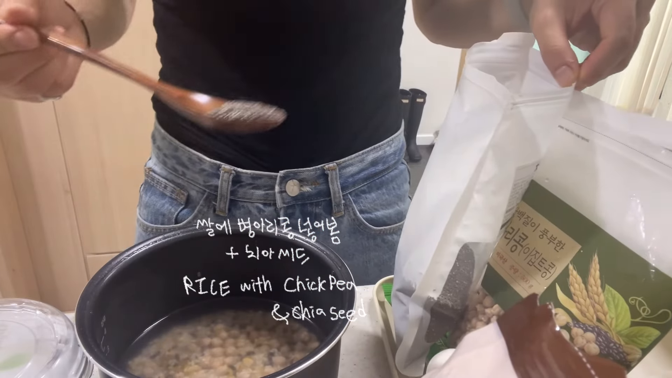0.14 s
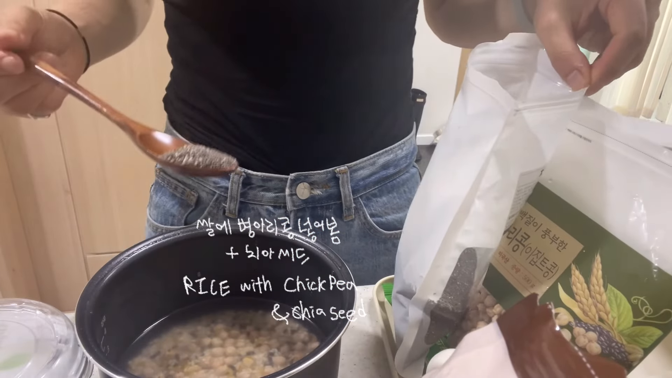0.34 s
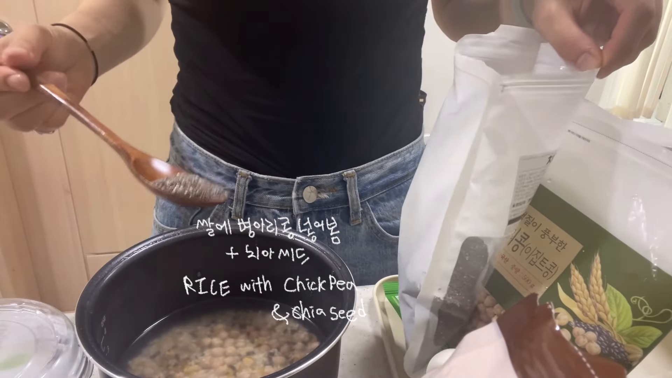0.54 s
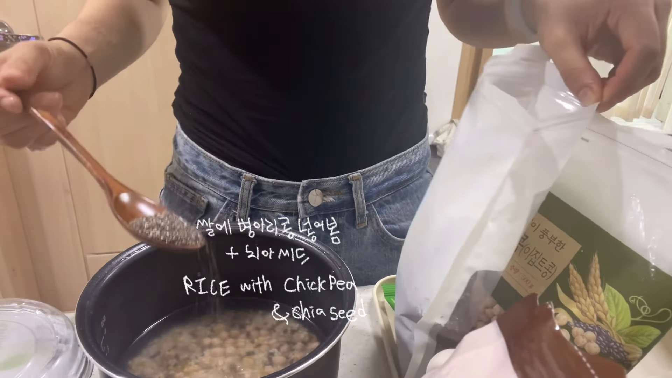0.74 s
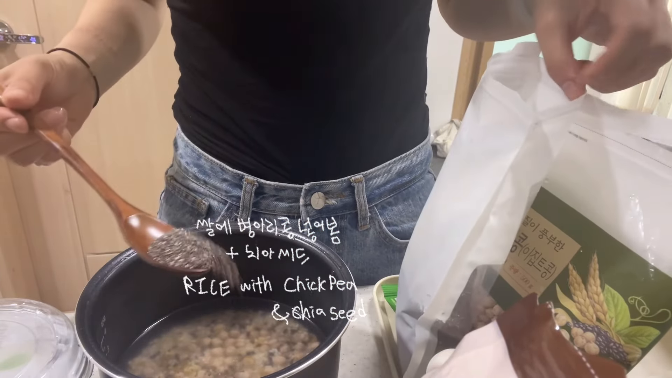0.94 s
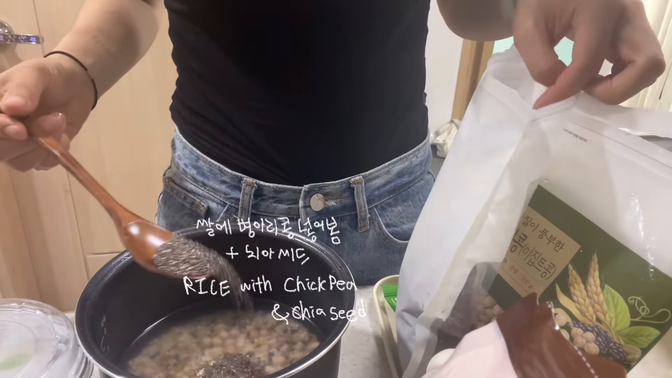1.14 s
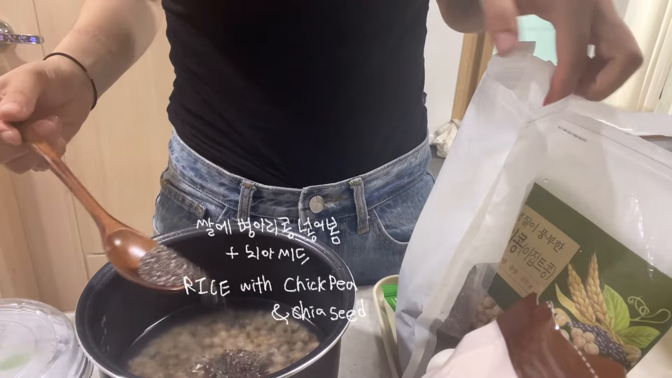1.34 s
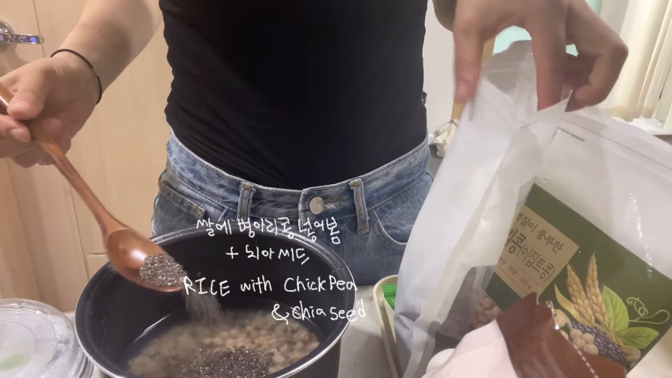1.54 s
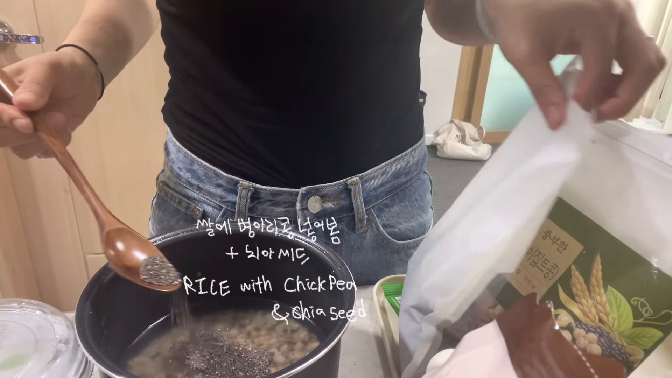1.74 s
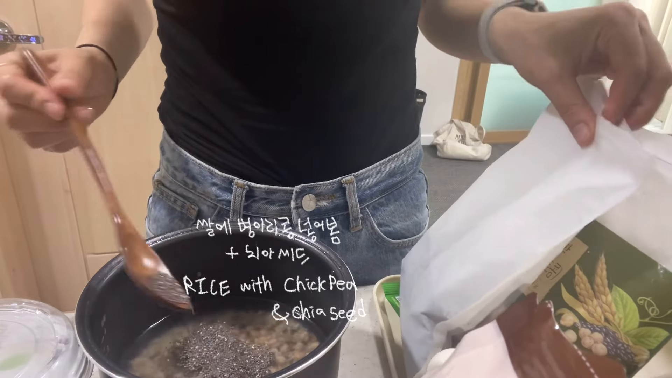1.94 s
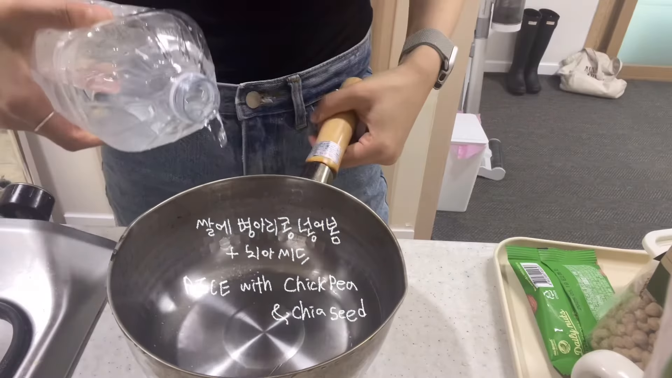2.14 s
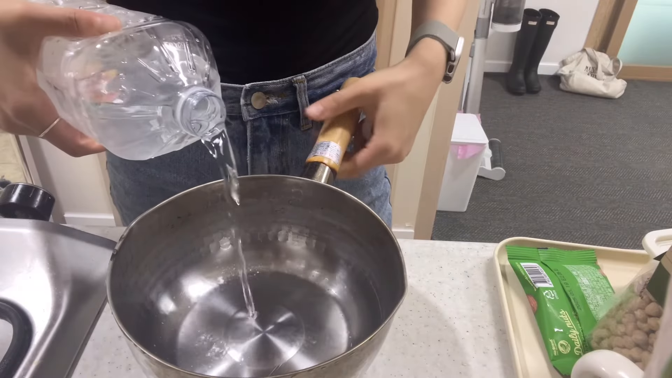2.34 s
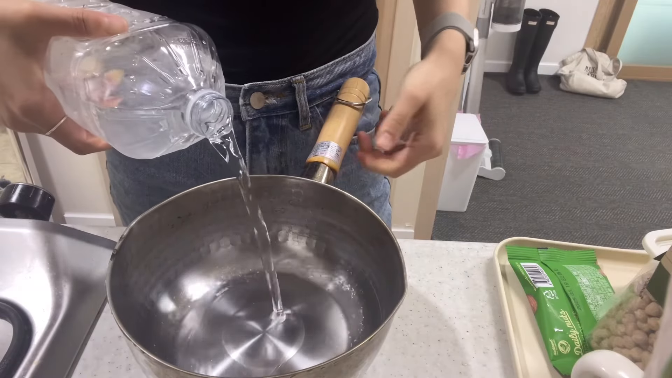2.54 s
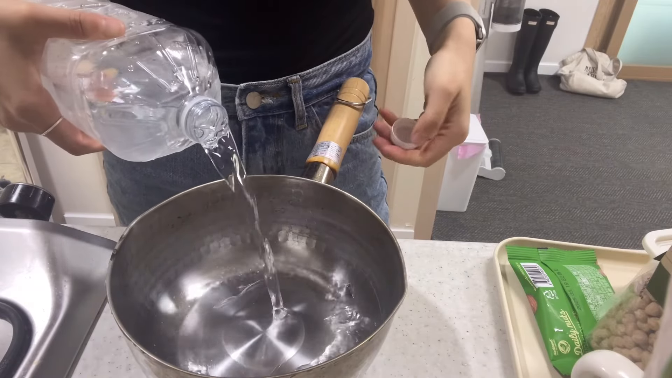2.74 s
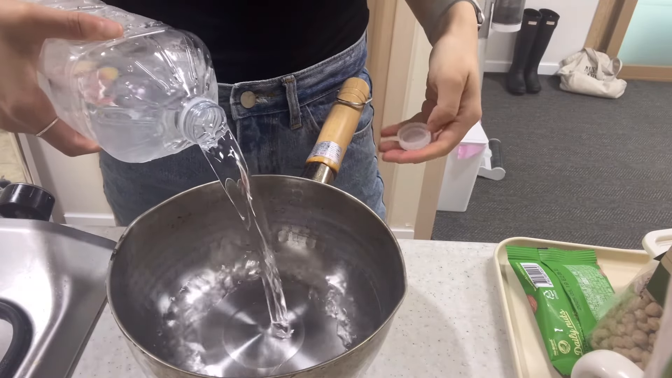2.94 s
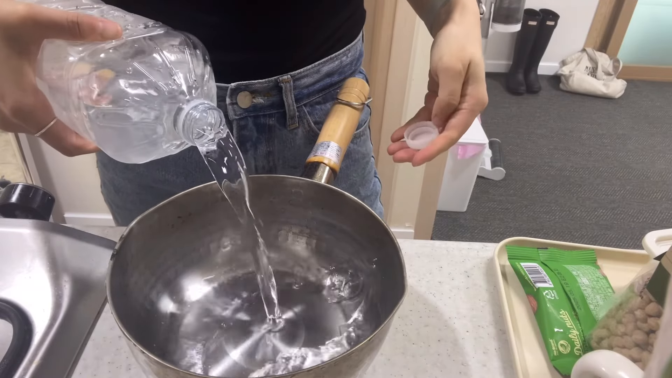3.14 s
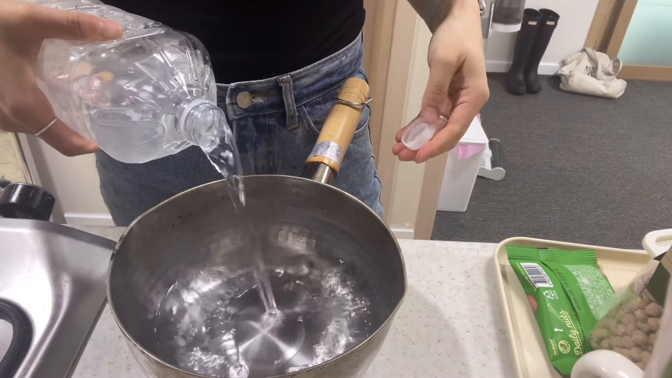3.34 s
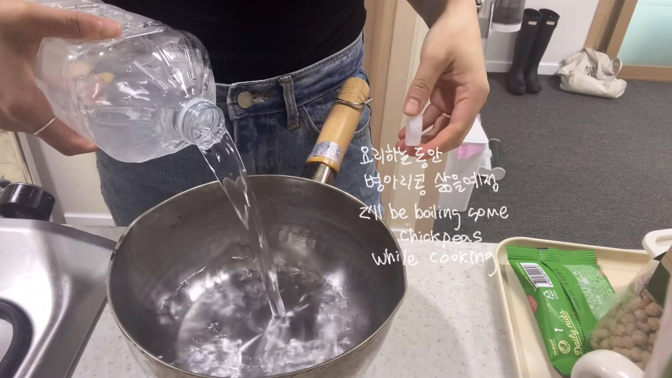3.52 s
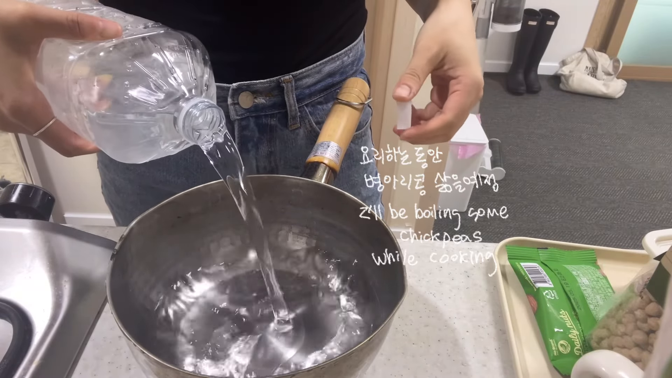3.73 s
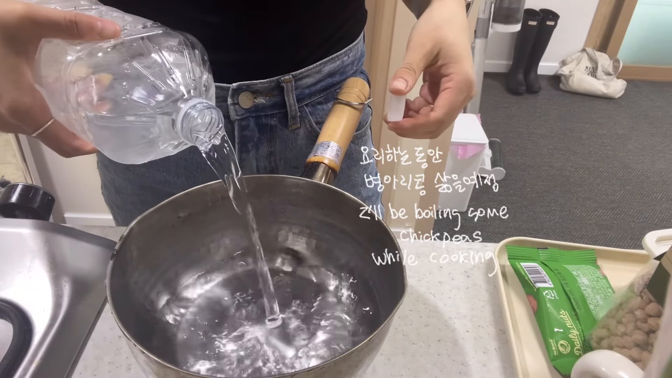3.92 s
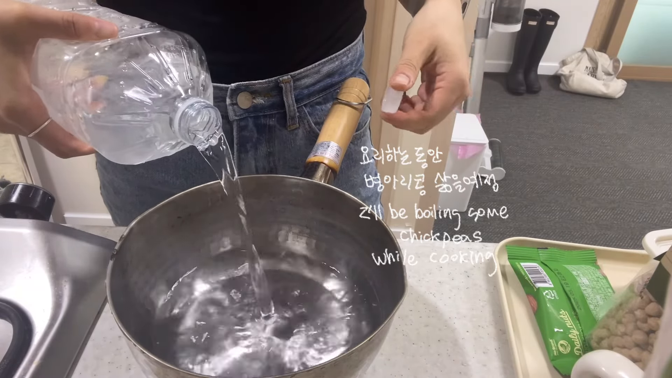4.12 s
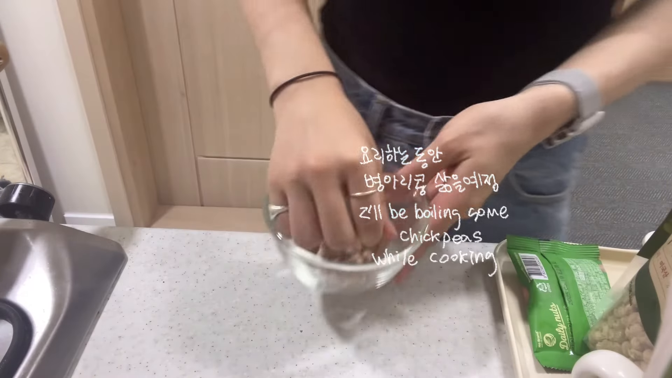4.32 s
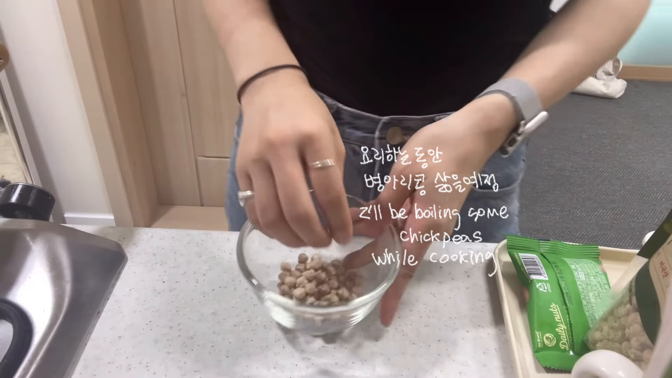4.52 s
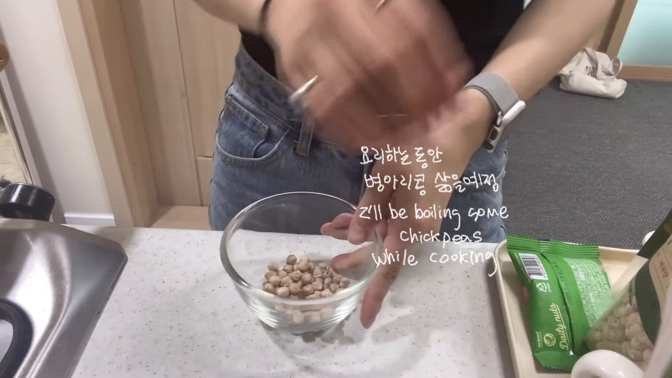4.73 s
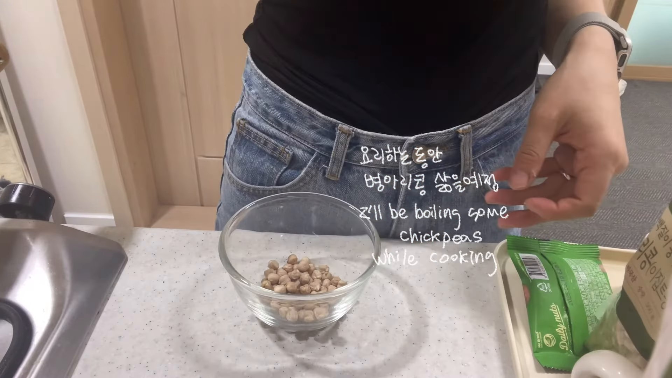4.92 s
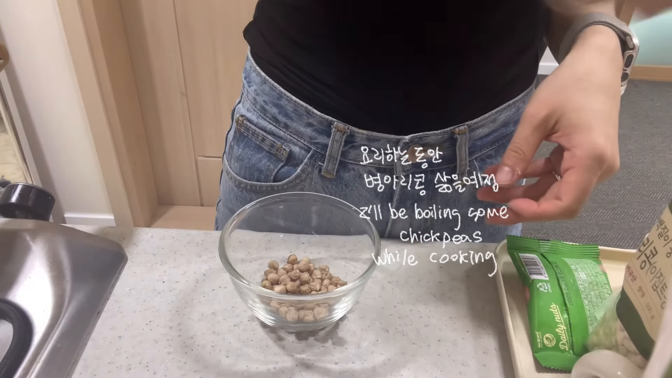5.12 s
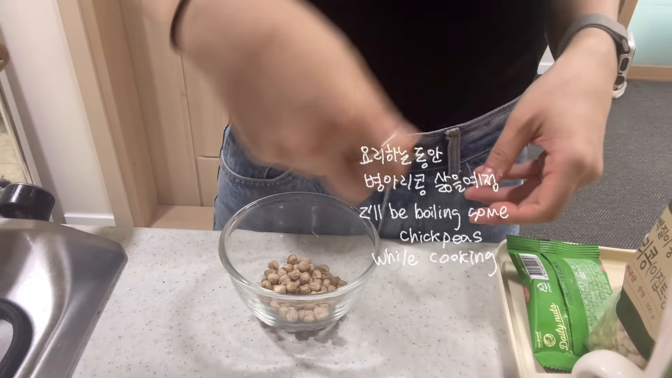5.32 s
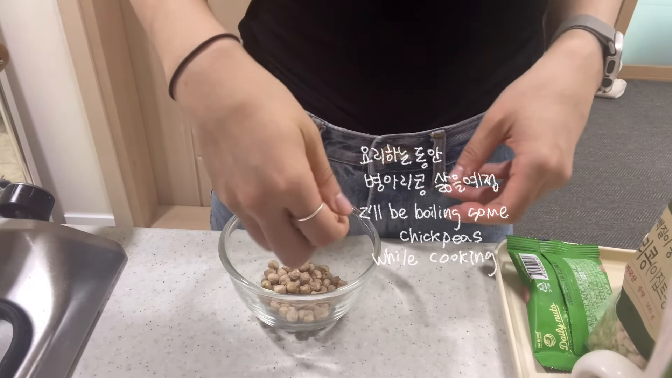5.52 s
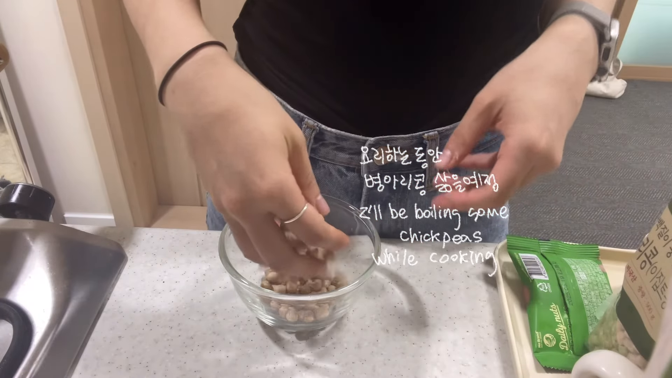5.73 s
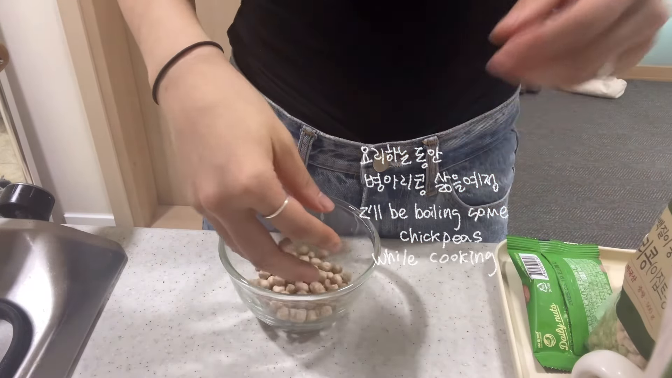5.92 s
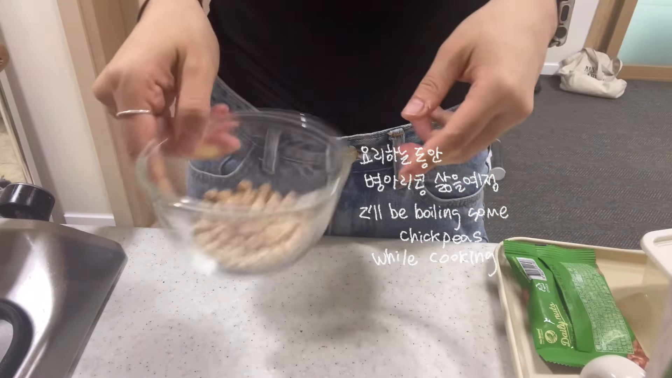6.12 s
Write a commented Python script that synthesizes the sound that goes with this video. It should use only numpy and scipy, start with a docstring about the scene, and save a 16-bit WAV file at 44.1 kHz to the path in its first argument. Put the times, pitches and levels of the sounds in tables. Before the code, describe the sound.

Film crinkles in bursts, with soft seed hiss between them. A hollow thump and a steely clink follow, then splashing water with rising bubble notes and fizz. It cuts off to a light glass clink, heavy bowl knocks, sparse pea ticks and a quick final rattle on glass. Close small microphone, short lively room, low hum and thin hiss.

```python
"""A small kitchen: a plastic bag rustles in noisy slips and crinkles while chia seeds hiss off a spoon.
A steel pan thumps down and clinks in ringing modes, and a thin stream of bottled water gushes into it
as rising bubble tones, splashes and fizz. A glass bowl knocks on the counter, sending bending waves through it,
a finger ring clinks on the glass, and dry chickpeas rattle in as clicks, glass notes and dull thuds.
An appliance rumble with one faint tone and a thin hiss lie underneath."""
import sys
import numpy as np
from scipy import signal
from scipy.fft import rfft, irfft
from scipy.io import wavfile

SR = 44100
rng = np.random.default_rng(int(sys.argv[2]) if len(sys.argv) > 2 else 0)


def wav_record(signal):
    """Record a signal, one row per channel, as 16-bit PCM in the file named by sys.argv[1]."""
    frames = np.transpose(np.atleast_2d(signal))
    bounded = np.clip(frames, -1, 1)
    # unit amplitude maps onto the largest positive 16-bit level
    quanta = np.round(bounded * 32767).astype(np.int16)
    wavfile.write(sys.argv[1], SR, quanta)


N = 272097


def amp(db):
    """Decibels to linear gain."""
    return 10 ** (np.asarray(db) / 20)


def rms_one(x):
    """Scale to an RMS level of one."""
    return x / np.sqrt(np.mean(x ** 2) + 1e-20)


def peak_one(x):
    """Scale to a peak of one."""
    return x / (np.abs(x).max() + 1e-20)


def at_hz(points, hz):
    """Read a frequency curve, interpolating along log frequency."""
    point_hz, values = np.array(points).T
    return np.interp(np.log(hz + 1), np.log(point_hz), values)


def add(out, s, sound):
    """Mix a sound in at time s."""
    at = max(round(s * SR), 0)
    out[at:at + len(sound)] += sound[:max(N - at, 0)]


def cut(x, hz, kind, order=2):
    """Butterworth low, high or band filter."""
    sos = signal.butter(order, np.clip(hz, 10, .45 * SR), kind, fs=SR, output="sos")
    return signal.sosfilt(sos, x)


def colour(x, spectrum, size=4096):
    """Causal (minimum-phase) filter with the given spectrum."""
    hz = np.arange(size // 2 + 1) * SR / size
    cepstrum = irfft(np.log(amp(at_hz(spectrum, hz))))
    # folding the cepstrum forward puts the energy as early as possible
    cepstrum[1:size // 2] *= 2
    cepstrum[size // 2 + 1:] = 0
    response = irfft(np.exp(rfft(cepstrum)))
    return signal.fftconvolve(x, response)[:len(x)]


def ring(clicks, hz, t60):
    """A resonator: a unit click sets a sine of height 1 ringing, 60 dB down after t60 seconds."""
    r, w = amp(-60 / (t60 * SR)), 2 * np.pi * hz / SR
    return signal.lfilter([0, np.sin(w)], [1, -2 * r * np.cos(w), r * r], clicks + 1e-18)


def crack(t60, size=2048):
    """The short noise burst of one contact."""
    return rng.standard_normal(size) * amp(-60 * np.arange(size) / SR / t60)


def grains(per_s, spread_db):
    """Random clicks of uneven size and either polarity."""
    sizes = amp(spread_db * np.minimum(rng.exponential(1, N), 4))
    return (rng.random(N) < per_s / SR) * sizes * rng.choice([-1, 1], N)


def swell(s, rise_s, fall_s, edge_db=10.5, roundness=1.47):
    """A rounded rise and fall around time s, down by edge_db after one rise or fall time."""
    t = np.arange(N) / SR - s
    away = np.minimum(np.abs(t / np.where(t < 0, rise_s, fall_s)), 10)
    return amp(-edge_db * away ** roundness)


def envelope(s, attack_s, hold_s, fall_db_per_s):
    """Attack, hold and a steady fall in dB."""
    t = np.arange(N) / SR - s
    return np.clip(t / attack_s, 0, 1) * amp(-fall_db_per_s * np.clip(t - attack_s - hold_s, 0, 1))


# How long the kitchen rings. Each row: frequency in Hz, decay by 60 dB in seconds.
ROOM_T60 = [(100, 0.55), (500, 0.42), (2000, 0.38), (8000, 0.25), (16000, 0.25)]


def kitchen(x, wet_db, size=24000):
    """Direct sound plus a dense tail that dies sooner in the treble."""
    t, hz = np.arange(size) / SR, np.arange(size // 2 + 1) * SR / size
    noise = rfft(rng.standard_normal(size))
    centres = np.log([f for f, t60 in ROOM_T60])
    tail = np.zeros(size)
    for row, (f, t60) in zip(np.eye(len(centres)), ROOM_T60):
        share = np.interp(np.log(hz + 1), centres, row)   # crossfaded bands
        tail += irfft(noise * share) * amp(-60 * t / t60)
    tail *= np.clip((t - .002) / 0.0058, 0, 1)   # short pre-delay, then a quick build-up
    return x + amp(wet_db) * signal.fftconvolve(x, tail / np.linalg.norm(tail))[:N]


# Rumble spectrum. Each row: frequency in Hz, relative level in dB.
HUM = [(18, -37), (30, -43), (59, -2.5), (91, -21.5), (103, -0.5), (151, -8), (205, -5.5), (385, -17),
       (421, -10), (446, -23), (839, -18), (1000, -18.5), (1300, -50), (2200, -120)]
# Hiss spectrum. Each row: frequency in Hz, relative level in dB.
HISS = [(260, -10), (450, -14.5), (1220, 1.5), (1730, -10), (2400, -3), (2870, -6.5), (4110, -8.5),
        (6340, -17), (6830, -14), (8050, -13.5), (8930, -21), (12400, -17.5), (16000, -23)]
# Hiss level over time. Each row: time in seconds, RMS level in dB.
HISS_DB = [(0, -57.5), (2.1, -72.5), (2.13, -68), (2.7, -70), (4.17, -63), (4.19, -57), (4.9, -57.5),
           (6.17, -56.5)]


def room_tone():
    """A low appliance rumble with one faint tone, under a thin hiss."""
    t = np.arange(N) / SR
    rumble = amp(-56.3) * rms_one(colour(rng.standard_normal(N), HUM))
    tone = amp(-57.5) * np.sin(2 * np.pi * 148.5 * t)
    hiss_level = amp(np.interp(t, *np.transpose(HISS_DB)))
    return rumble + tone + hiss_level * rms_one(colour(rng.standard_normal(N), HISS))


# The hand shifts the bag. Each row: time of the height in seconds, relative rustle level in dB,
# relative low flapping level in dB, rise in seconds, fall in seconds.
RUBS = [(0.03, -51.5, -56, .05, 0.047), (0.2, -45, -56, .14, 0.062), (0.49, -36, -50, 0.22, 0.12),
        (0.675, -38, -41.5, 0.029, 0.037), (0.805, -51.5, -55, 0.038, 0.062),
        (0.942, -42.5, -60, 0.041, 0.045), (1.46, -73, -47, 0.042, 0.078),
        (1.63, -53.5, -51.5, 0.08, 0.046), (1.705, -36.5, -37.5, 0.022, 0.023),
        (1.789, -49, -38.5, 0.049, 0.028), (1.94, -48.5, -50, 0.21, .09)]
# Spectrum of the sliding film. Each row: frequency in Hz, relative level in dB.
RUSTLE = [(290, -34), (500, -10.5), (819, -17), (906, -10.5), (1110, -10.5), (1640, 0), (2260, -10.5),
          (3290, -6.5), (5470, -13.5), (6140, -9.5), (7100, -15), (16000, -34)]
# Spectrum of the flapping sheet. Each row: frequency in Hz, relative level in dB.
FLAP = [(47, -36), (80, 7.5), (146, 3.5), (404, 2.5), (803, -8), (896, -9), (1500, -10), (1950, -55),
        (3300, -120)]
# The loudest creases snapping. Each row: start in seconds, relative peak in dB, pitch in Hz,
# treble edge in dB beside the panel.
CREASES = [(0.078, -38, 1570, -21.5), (0.086, -24.5, 1590, -16), (0.133, -29, 1590, -27),
           (0.153, -31, 1600, -21), (0.319, -28, 1580, -31), (0.393, -19.5, 2100, -4),
           (0.643, -23.5, 1230, -3), (0.685, -13, 1229, -7.5), (1.43, -42, 894, -21),
           (1.474, -37, 980, -26), (1.574, -30, 882, -27), (1.626, -30, 1580, -36), (1.683, -31, 1490, -35),
           (1.702, -16.5, 1730, -21), (1.752, -18, 1600, -29), (1.767, -15, 1454, -30),
           (1.783, -21, 1250, -16), (1.855, -22, 1310, -18), (1.939, -26, 1600, -19),
           (1.969, -28, 1090, -20), (2.055, -27.5, 1080, -44), (2.096, -22.5, 824, -5)]
# Spectrum of a snapping panel. Each row: frequency in Hz, relative level in dB.
CREASE = [(60, -62), (250, 5), (600, 8), (1400, 8), (3000, 1.5), (6500, -1), (16000, -59)]


def bag():
    """The film slides in countless tiny slips, flaps and crinkles as a sheet, and snaps where a crease gives way."""
    rustle, flap = np.zeros((2, N))
    for s, rustle_db, flap_db, rise_s, fall_s in RUBS:
        rub = swell(s, rise_s, fall_s)
        rustle += amp(rustle_db) * rub
        flap += amp(flap_db) * rub

    fine_slips = rms_one(grains(per_s=5800, spread_db=3.5))
    coarse_slips = rms_one(grains(per_s=330, spread_db=8.0))
    slips = fine_slips + amp(-15) * coarse_slips
    slide = amp(-2.0) * rustle * rms_one(colour(slips, RUSTLE))
    effort = rustle / rustle.max()   # a harder rub is brighter
    slide += amp(-16.5) * rustle * effort * rms_one(cut(slips, (5500, 13000), "band", order=1))
    flaps = colour(grains(per_s=700, spread_db=2.0), FLAP)
    slide += amp(1) * flap * rms_one(cut(flaps, 76, "high"))

    # lesser creases, wherever the film moves
    crinkles_per_s, crinkle_hz = 57, (940, 1280, 1580)
    crinkles = np.zeros(N)
    for hz in crinkle_hz:
        crinkles += ring(grains(per_s=crinkles_per_s / len(crinkle_hz), spread_db=3.5), hz, t60=0.01)
    slide += amp(-7) * (flap + .35 * rustle) * rms_one(np.gradient(crinkles))

    snaps = np.zeros(N)
    for s, db, hz, treble_db in CREASES:
        burst = crack(t60=0.031)
        panel = peak_one(colour(burst, CREASE)) + peak_one(np.gradient(ring(burst, hz, t60=0.013)))
        panel = peak_one(cut(panel, 4000, "low"))
        edge = peak_one(cut(cut(burst, 5700, "high"), 11300, "low", order=1))
        add(snaps, s, amp(db - 4.0) * peak_one(panel + amp(treble_db) * edge))
    return kitchen(slide + snaps, wet_db=-13)


# Each shake of the spoon spills seeds. Each row: start in seconds, relative level in dB,
# attack in seconds, hold in seconds.
SPILLS = [(0.868, -54, 0.025, .04), (1.018, -51.5, 0.026, 0.076), (1.22, -47, 0.023, 0.013),
          (1.348, -57, .03, .02), (1.425, -52.5, 0.022, 0.017), (1.524, -54.5, 0.073, .03),
          (1.7, -52.5, 0.015, 0.009), (1.907, -62.5, 0.049, .1)]
# Spectrum of the trickling seeds. Each row: frequency in Hz, relative level in dB.
SEED_HISS = [(2060, -55), (3500, -30), (4540, -29), (4870, -9), (5190, -11), (6700, -3), (8740, -5),
             (9380, -0.5), (10400, -3.5), (12500, -2), (16000, -7.5)]


def seeds():
    """Thousands of tiny seeds make a fine, bright hiss that swells with each shake and trickles away."""
    flow = np.zeros(N)
    for s, db, attack_s, hold_s in SPILLS:
        flow += amp(db) * envelope(s, attack_s, hold_s, fall_db_per_s=167)
    return amp(-3.0) * flow * rms_one(colour(grains(per_s=9100, spread_db=4.0), SEED_HISS))


# Hollow modes of the pan's base on the counter. Each row: frequency in Hz, relative level in dB,
# decay by 60 dB in seconds.
THUMP = [(126, -18.5, 0.26), (255, 5, 0.031), (372, -11.5, 0.17), (530, -9.5, 0.035), (870, -25, 0.038)]


def thump(size=8000):
    """The pan lands flat: a tick and a short hollow boom of decaying modes."""
    out, t = np.zeros(N), np.arange(size) / SR
    boom = sum(amp(db - 60 * t / t60) * np.sin(2 * np.pi * hz * t) for hz, db, t60 in THUMP)
    tick = peak_one(cut(crack(t60=0.0012), 5500, "low", order=1))
    add(boom, 0, amp(-8) * tick)
    add(out, 2.1068, amp(-19) * cut(boom, 120, "high"))
    return kitchen(out, wet_db=-10)


# Long notes of the steel pan. Each row: frequency in Hz, relative level in dB, decay by 60 dB in seconds.
PAN = [(203, -3, 0.15), (287, -0.5, 0.12), (368, -3.5, 0.24), (700, -8, 0.37), (1190, -2.5, 0.43),
       (1680, -10.5, 0.38), (1867, -1, 0.14), (2240, -1, 0.079), (2350, -24, 0.37), (2920, -4, 0.15),
       (3640, -17, 0.24), (4025, -10, 0.15), (5260, -3.5, 0.19), (5340, 2.5, 0.15), (6800, -9, 0.31),
       (7160, -5, 0.31), (8796, -11, 0.32), (11600, -30, 0.29)]
# Spectrum of its dense upper modes. Each row: frequency in Hz, relative level in dB.
PAN_SHIMMER = [(350, -51), (600, -18), (688, 9.5), (801, -10), (1080, -16.5), (1160, -13), (1390, -19),
               (1660, -2), (2470, -9), (4650, -15), (5260, 3), (6200, -25), (7410, -5), (11200, -10.5),
               (12500, -26), (16000, -49)]
# Blows on the pan. Each row: start in seconds, relative level in dB.
PAN_BLOWS = [(2.283, -52.5), (2.3461, -16.5), (2.369, -29)]


def pan(count=300, size=26000):
    """Thin steel rings with a few long notes and a shimmer of close, short ones."""
    t, blows = np.arange(size) / SR, np.zeros(N)
    notes = sum(amp(db - 60 * t / t60) * np.sin(2 * np.pi * hz * t) for hz, db, t60 in PAN)
    shimmer = np.zeros(size)
    scatter = rng.standard_normal((count, 3))
    for centre_hz, (offset, strength, life) in zip(np.linspace(600, 15500, count), scatter):
        hz = centre_hz + 25 * offset
        t60 = 0.19 * amp(life) * (centre_hz / 5000) ** -.15   # higher modes die a little sooner
        level = amp(at_hz(PAN_SHIMMER, hz) + 1.7 * strength)
        shimmer += level * np.sin(2 * np.pi * (hz * t + life)) * amp(-60 * t / t60)
    sound = amp(-20.5) * notes + amp(-6.0) * peak_one(shimmer)
    contact = peak_one(cut(crack(t60=0.011), (1300, 11000), "band"))
    add(sound, 0, amp(-2) * contact)
    for s, db in PAN_BLOWS:
        add(blows, s, amp(db) * sound)
    return kitchen(blows, wet_db=-6.5)


def pan_walls(x, count=9):
    """Sound bounces a few times across the pan before it leaves, later bounces weaker."""
    out = x.copy()
    for delay_s, sign in zip(rng.uniform(0.0011, 0.013, count), rng.choice([-1, 1], count)):
        add(out, delay_s, sign * amp(2.5 - 2900 * delay_s) * x)
    return out


def bubble(hz, cycles, rise_hz_per_s, size=3000):
    """A trapped pocket of air swells for a cycle and rings, its pitch rising as it nears the surface."""
    t = np.arange(size) / SR
    phase = 2 * np.pi * (hz * t + rise_hz_per_s * t ** 2 / 2)
    decay = amp(-60 * t * hz / cycles)
    onset = (1 - np.exp(-t * hz)) ** 2
    return peak_one(np.sin(phase) * decay * onset)


# The largest air bubbles. Each row: start in seconds, relative peak in dB, nominal pitch in Hz.
BUBBLES = [(2.7286, -43, 1170), (2.824, -31, 6220), (2.894, -35.5, 9700), (2.9875, -29.5, 14100),
           (3, -27.5, 7800), (3.0645, -35.5, 4220), (3.071, -39.5, 1760), (3.1696, -32.5, 1750),
           (3.235, -38, 5720), (3.333, -43, 1410), (3.3922, -25.5, 4700), (3.413, -40.5, 1295),
           (3.488, -36, 4450), (3.495, -34.5, 3300), (3.5224, -29, 4730), (3.5308, -29, 1976),
           (3.549, -33, 3960), (3.565, -29, 1635), (3.5837, -23, 5250), (3.6112, -13, 1587),
           (3.7032, -35, 1420), (3.909, -24.5, 4080), (3.9664, -35, 4180), (4.013, -28, 14200),
           (4.0888, -30, 10300), (4.1604, -24.5, 14000)]
# The stream wobbles and gushes. Each row: start in seconds, relative level in dB, hold in seconds,
# lowest pitch in Hz.
GUSHES = [(2.991, -44.5, 0.027, 4000), (3.038, -45, 0.059, 1190), (3.157, -52.5, .01, 1500),
          (3.268, -40.5, 0.04, 800), (3.389, -40.5, 0.013, 1200), (3.49, -41.5, 0.061, 2480),
          (3.553, -41.5, 0.07, 1500), (3.663, -53, 0.014, 1200), (3.827, -51.5, 0.056, 3500),
          (3.902, -39, 0.07, 3100), (4.003, -54.5, 0.13, 5500), (4.16, -40.5, .015, 3460)]
# Spectrum of splashing drops and fizz. Each row: frequency in Hz, relative level in dB.
SPLASH = [(700, -3), (1500, -4), (4000, -4.5), (7000, -4), (11000, -4), (16000, -3.5)]


def water(count=2600):
    """The stream drags air under: loud bubbles, each with a splash, over a fizz of small ones that gushes."""
    large, splashes, small = np.zeros((3, N))
    for s, db, hz in BUBBLES:
        # every large bubble is tuned slightly below its nominal pitch
        add(large, s, amp(db - 9.0) * bubble(hz * 0.967, cycles=76, rise_hz_per_s=25400))
        drops = crack(t60=.004) + amp(-14) * crack(t60=.05) * rng.exponential(1, 2048)
        splash_db = -23 + 0.47 * db   # splashes vary less than their bubbles
        add(splashes, s, amp(splash_db) * peak_one(colour(drops, SPLASH)))

    from_s, until_s = 2.82, 4.19   # while the stream hits the pan
    pour_s = until_s - from_s
    for when, width, strength, life in rng.random((count, 4)):
        hz = max(15000 - 13900 * width, 500)   # wider bubbles sound lower
        level = amp(at_hz(SPLASH, hz) - 34 * strength)
        blip = level * bubble(hz, cycles=8 + 45 * life, rise_hz_per_s=25000)
        add(small, from_s + when * pour_s, blip)
    patter = rms_one(colour(grains(per_s=1100, spread_db=3.0), SPLASH))
    fizz = cut(amp(-9.5) * rms_one(small) + amp(-14) * patter, 14000, "low", order=1)

    flow = envelope(from_s, attack_s=0.019, hold_s=pour_s, fall_db_per_s=600)
    spray = amp(-60.5) * flow * cut(fizz, 2300, "high")   # steady stream between gushes
    for s, db, hold_s, lowest_hz in GUSHES:
        gush = envelope(s, attack_s=0.0019, hold_s=hold_s, fall_db_per_s=271)
        spray += amp(db) * gush * cut(fizz, lowest_hz, "high")
    # stray drops ticking on the steel
    droplets = amp(-38.5) * flow * cut(grains(per_s=40, spread_db=5.5), (5500, 13000), "band")
    bounced = pan_walls(splashes + spray + amp(4.5) * large)
    return kitchen(large + droplets + .5 * bounced, wet_db=-14.5)


# Spectrum of the counter slab. Each row: frequency in Hz, relative level in dB.
COUNTER = [(50, -18), (110, -7.5), (190, -2.5), (280, 7), (350, 6.5), (430, -2), (560, -4), (760, -8),
           (1000, -9.5), (1350, -8), (1800, -23.5), (2400, -18), (4000, -24.5), (8000, -33.5), (16000, -35)]


def counter(force, size=4096):
    """Bending waves in the slab carry highs faster than lows: each blow falls in pitch and returns from the edges."""
    root_hz = np.sqrt(np.arange(size // 2 + 1) * SR / size)
    spread = root_hz - root_hz ** 2 / (2 * root_hz[-1])
    paths = [(.21, 9.5), (.5, -16), (.78, -10)]   # dispersion in cycles per root Hz, level in dB
    slab = irfft(sum(amp(db) * np.exp(-2j * np.pi * length * spread) for length, db in paths))
    return signal.fftconvolve(force, colour(slab, COUNTER))[:len(force)]


# Blows on the counter. Each row: start in seconds, peak in dB, contact cut-off in Hz.
KNOCKS = [(4.53, -28, 905), (4.5403, -0.5, 3150), (4.549, -35, 1800), (4.579, -20, 1514),
          (4.6307, -18, 404), (4.7422, -10.5, 1340), (4.7611, -9, 1960), (4.7705, -15, 350)]


def knocks(size=4096):
    """The bowl lands on the counter and rocks; a softer contact is duller, and every blow also grates briefly."""
    out = np.zeros(N)
    for s, db, contact_hz in KNOCKS:
        grating = cut(crack(t60=0.076, size=size), 386, "high")
        force = signal.unit_impulse(size) + amp(-25.5) * grating
        add(out, s, amp(db) * peak_one(counter(cut(force, contact_hz, "low", order=1))))
    near = cut(out, 630, "low", order=1)   # the slab's slowest waves hardly reach the room
    return near + kitchen(out - near, wet_db=-12)


# The peas hop inside the bowl after it lands. Each row: start in seconds, level in dB, hold in seconds.
HOPS = [(4.54, -32, 0.035), (4.754, -37, 0.012)]


def hopping_peas():
    """Jolted peas drop back on the bowl's base in a dull, loose clatter."""
    jolt = np.zeros(N)
    for s, db, hold_s in HOPS:
        jolt += amp(db) * envelope(s, attack_s=0.0051, hold_s=hold_s, fall_db_per_s=176)
    return jolt * rms_one(cut(grains(per_s=600, spread_db=2.5), (380, 1250), "band"))


# Modes of the glass bowl. Each row: frequency in Hz, relative level in dB under a pea,
# relative level in dB under a finger ring, decay by 60 dB in seconds.
BOWL = [(1165.3, -18, -41, 0.24), (2620, -14.5, -6.5, 0.42), (4651, 0.5, -5.5, 0.19),
        (7190, -19, -0.5, 0.2), (7230, 5.5, -28, 0.047), (7220, 6.5, -32, 0.017), (10010, -0.5, -38, 0.014),
        (9965, -5.5, -36, 0.065), (10380, -16, -14, 0.13), (12750, -14, -36, 0.06), (12740, -4, -36, 0.059),
        (14400, -7, -40, 0.052), (13900, -22, -43, 0.056), (14300, -14, -49, 0.076),
        (13900, -5.5, -46, 0.11), (13900, -14, -40, 0.091), (15338, -12.5, -36, 0.07)]


def glass(strengths, size=20000):
    """The bowl's modes ringing out, each from its own strength."""
    t, out = np.arange(size) / SR, np.zeros(size)
    for strength, (hz, pea_db, ring_db, t60) in zip(strengths, BOWL):
        out += strength * amp(-60 * t / t60) * np.sin(2 * np.pi * hz * t)
    return out


# Finger ring touching the bowl. Each row: start in seconds, relative level in dB of the tap,
# relative level in dB of the lasting ring.
CLINKS = [(4.185, -46, -36.5), (4.292, -24, -57)]


def clinks():
    """A finger ring taps the bowl; the hand soaks up most of the ringing at once and a faint part rings on."""
    out, free = np.zeros(N), glass(amp(np.array(BOWL)[:, 2]))
    t = np.arange(len(free)) / SR
    tap = free / (1 + (t / 0.01) ** 4)   # damped by the hand after 10 ms
    contact = cut(cut(crack(t60=0.091), 2500, "high"), 5800, "low")
    add(tap, 0, amp(-7) * peak_one(contact))
    for s, tap_db, ring_db in CLINKS:
        add(out, s, amp(tap_db - 1.5) * tap + amp(ring_db - 12.5) * free)
    return kitchen(out, wet_db=-11)


# Chickpeas landing in the bowl. Each row: start in seconds, relative level in dB, relative level in dB
# of the wall's notes (high on bare glass, low on other peas).
PEAS = [(5.6392, -11.5, 6), (5.6621, -2, -18), (5.6871, -17, -14), (5.693, -10.5, -22), (5.7051, -5.5, -30),
        (5.7268, -8.5, -7), (5.7394, -12, -17), (5.7548, -4, -9), (5.77, -5, -2), (5.7775, -4, -4),
        (5.7933, -1.5, -5), (5.8061, -6.5, -24), (5.8225, -6, -23), (5.8587, -8, -8), (5.8902, -12.5, -17),
        (5.9496, -26.5, -18), (6.0159, -26.5, -6)]
# Spectrum of a pea's click. Each row: frequency in Hz, relative level in dB.
PEA_CLICK = [(300, -16.5), (1100, -4.5), (1900, -10.5), (4000, -11), (6500, -4.5), (11000, -11.5),
             (15000, -11.5)]
# Single dry peas ticking against each other. Each row: start in seconds, relative peak in dB.
TICKS = [(4.788, -11.5), (4.8264, -16), (4.9058, -24), (5.1037, -21.5), (5.213, -23), (5.566, -14.5),
         (5.6188, -21)]
# Chickpeas jostling, in the hand and then in the bowl. Each row: start in seconds, relative level in dB,
# attack in seconds, hold in seconds.
JOSTLES = [(5.494, -57.5, 0.027, 0.09), (5.656, -40.5, .003, 0.23)]


def chickpeas():
    """Hard peas click, ring the glass and thud through it into the counter, then jostle to rest."""
    clicks, rings, force, ticks = np.zeros((4, N))
    mode_db = np.array(BOWL)[:, 1]
    for s, db, wall_db in PEAS:
        add(clicks, s, amp(db - 13.5) * peak_one(colour(crack(t60=0.0064), PEA_CLICK)))
        # the spot that is hit decides which modes answer
        place = amp(rng.normal(0, 0.74, len(BOWL))) * rng.choice([-1, 1], len(BOWL))
        place[1:3] *= amp([0.44 * wall_db, wall_db])   # the 2.6 and 4.6 kHz notes
        place[3:6] *= amp(-8)   # the 7.2 kHz group
        add(rings, s, amp(db - 14.0) * glass(amp(mode_db) * place))
        add(force, s, amp([db]))
    for s, db in TICKS:
        add(ticks, s, amp(db - 19.5) * peak_one(colour(crack(t60=0.023), PEA_CLICK)))
    stir = np.zeros(N)
    for s, db, attack_s, hold_s in JOSTLES:
        stir += amp(db) * envelope(s, attack_s, hold_s, fall_db_per_s=183)
    jostle = amp(1) * stir * rms_one(colour(grains(per_s=900, spread_db=8.0), PEA_CLICK))
    thuds = amp(-28.5) * peak_one(counter(cut(force, 2100, "low", order=1)))
    return kitchen(clicks + jostle + thuds + ticks, wet_db=-1.5) + kitchen(rings, wet_db=-8.5)


def scene():
    """All layers mixed to one channel, background first."""
    cooking = room_tone() + bag() + seeds() + thump() + pan() + water()
    bowl = knocks() + hopping_peas() + clinks() + chickpeas()
    return (cooking + bowl)[None]


def record(dry):
    """A small microphone drops the deep bass; the top is cut steeply."""
    steep_top = signal.ellip(10, .2, 80, 15900, fs=SR, output="sos")   # ripple dB, stopband dB, cut-off Hz
    return signal.sosfilt(steep_top, cut(dry, 46, "high", order=4))


dry = scene()
out = record(dry)
wav_record(out)
```